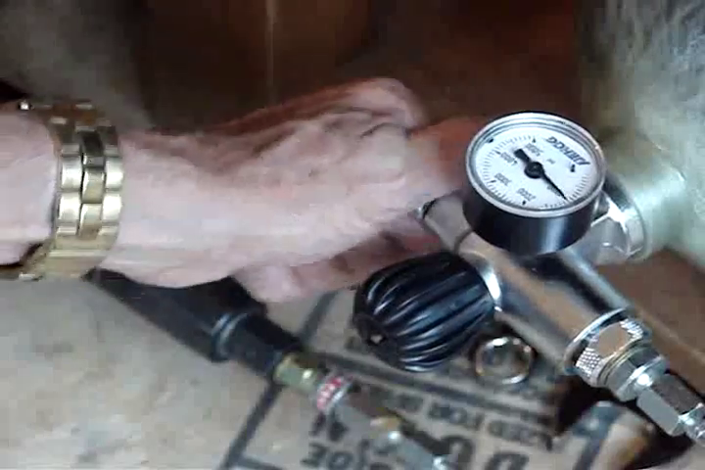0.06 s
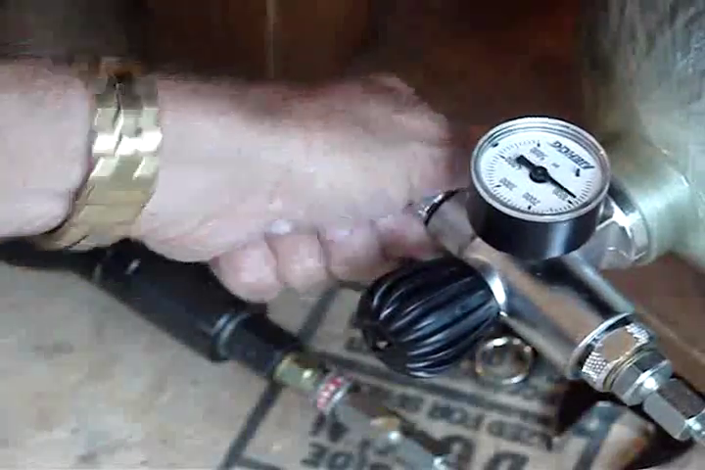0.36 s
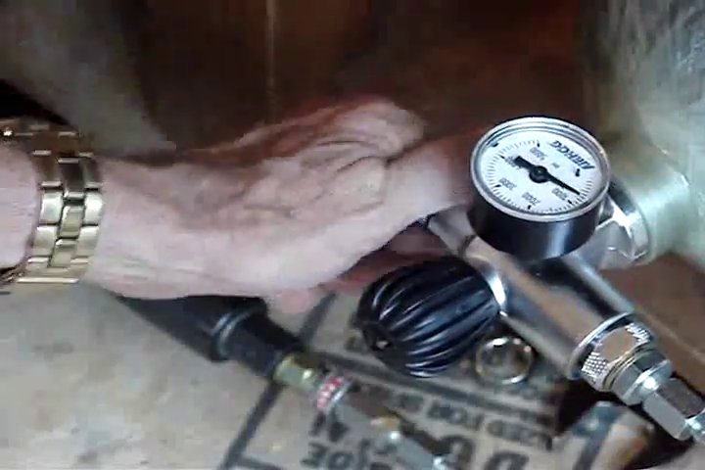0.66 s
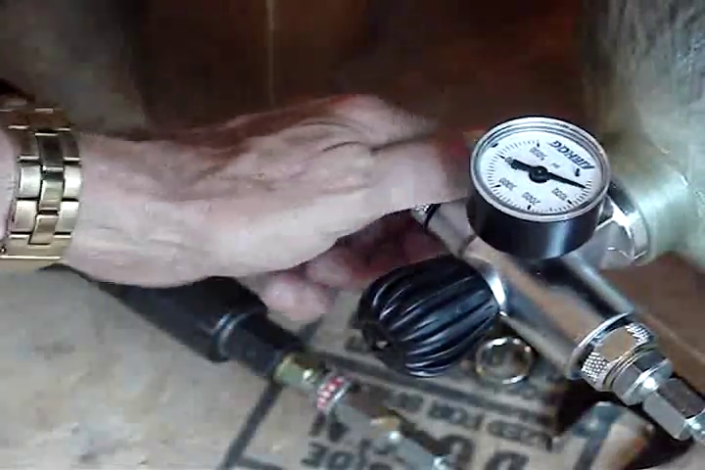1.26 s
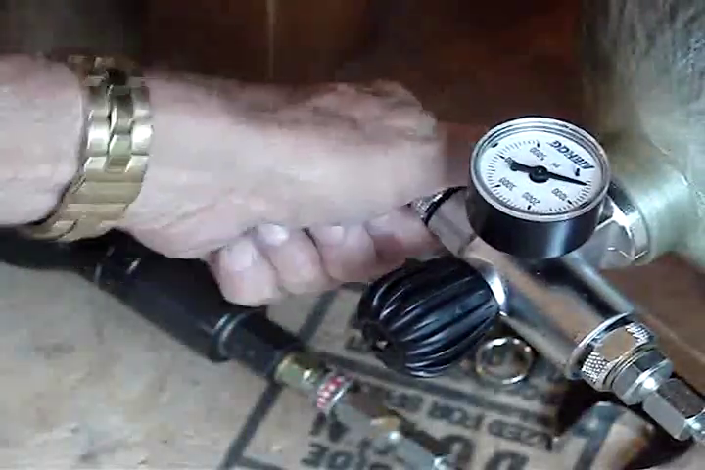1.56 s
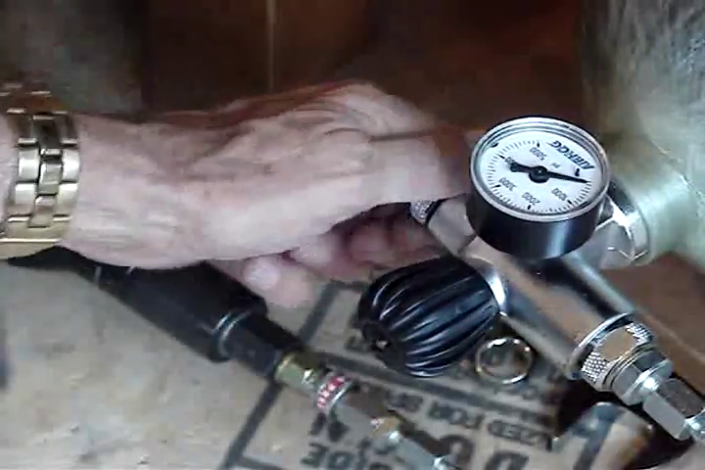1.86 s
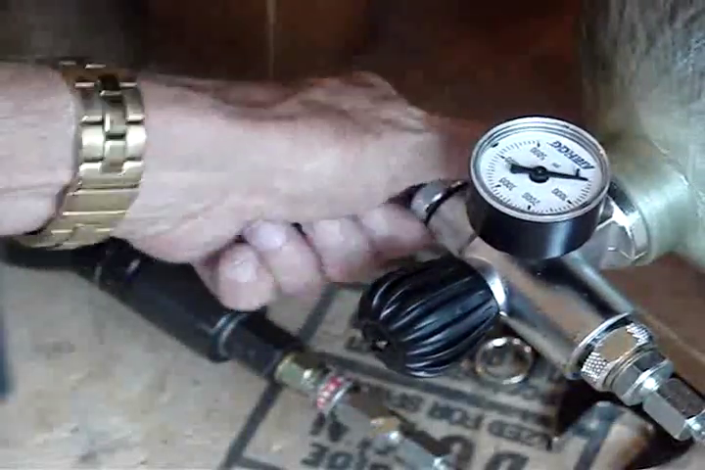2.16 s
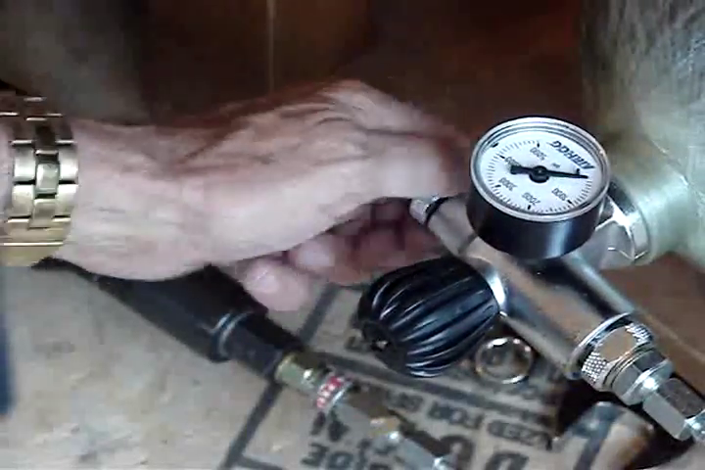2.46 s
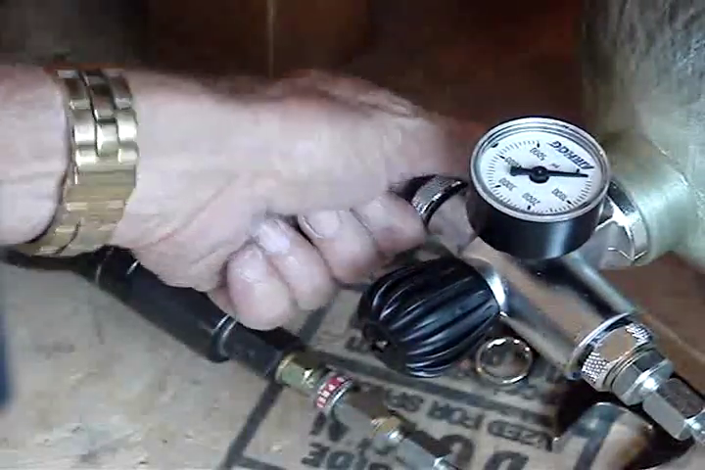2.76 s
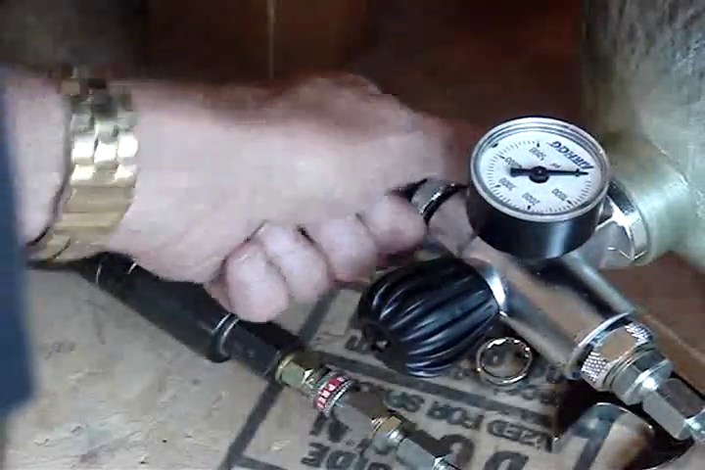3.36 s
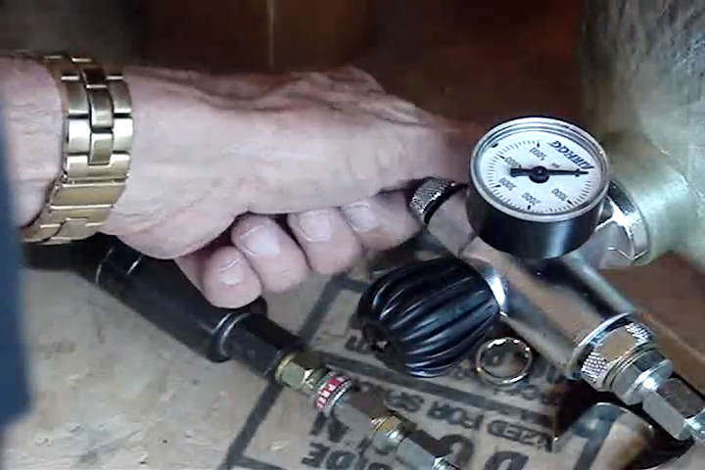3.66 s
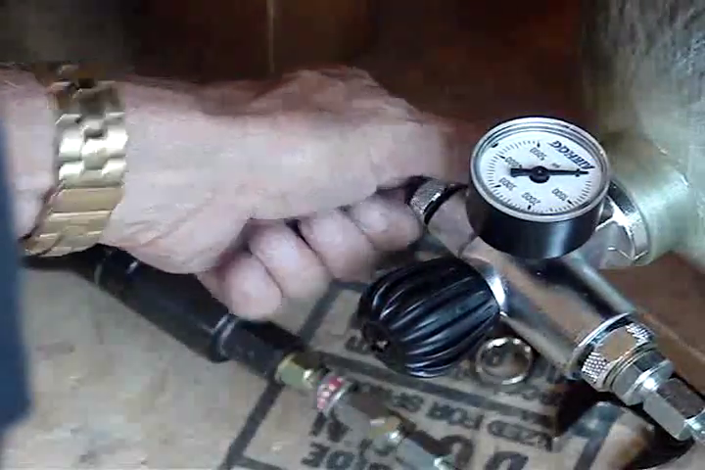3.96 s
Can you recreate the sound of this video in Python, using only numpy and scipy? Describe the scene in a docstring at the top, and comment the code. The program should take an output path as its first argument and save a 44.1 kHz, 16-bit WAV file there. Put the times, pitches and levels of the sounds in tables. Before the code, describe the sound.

Compressed air hisses through a valve in surges, then dies away over a low workshop hum.

```python
"""A close, bright hiss comes first: compressed air through a valve whose knob a hand turns in short twists.
The hiss rings in the hose fittings, flares into a bright gliding band on the first twists and dies
away as the pressure evens out. Beneath it the low rush and hum of a workshop slowly come forward.
One microphone hears it all, with faint reflections from bench and walls."""
import sys
import numpy as np
from scipy import signal
from scipy.fft import rfft, irfft
from scipy.io import wavfile

SR = 44100
rng = np.random.default_rng(int(sys.argv[2]) if len(sys.argv) > 2 else 0)


def dump(signal):
    """Clip the signal to [-1, 1] and save it as 16-bit WAV at the path in sys.argv[1]."""
    limited = np.clip(np.atleast_2d(signal).T, -1, 1)
    pcm = np.round(limited * 32767).astype(np.int16)
    wavfile.write(sys.argv[1], SR, pcm)


N = 176400
CUTOFF_HZ = 10090

# strength of the flow, heard as the hiss close to the valve: (time [s], level [dB])
FLOW_LEVEL = [(0, -34), (0.2, -35.5), (0.35, -37), (0.55, -36), (0.74, -34), (0.92, -35.5), (1.1, -37.0),
              (1.29, -38.5), (1.34, -34), (1.47, -36.5), (1.62, -35.5), (1.8, -36), (1.99, -35.5),
              (2.2, -39), (2.46, -40.5), (2.52, -42), (2.58, -41), (2.72, -44), (3.2, -51), (3.42, -50.5),
              (3.92, -58), (4, -54)]
# colour of that hiss: (frequency [Hz], level [dB])
HISS_COLOUR = [(100, -32), (300, -22.5), (600, -15.5), (800, -15.5), (980, -12), (1200, -15), (1500, -12),
               (1800, -10), (2300, -5.5), (2750, -5.5), (3080, -2.5), (3350, -3), (3600, -1), (3850, 1.5),
               (4300, -2), (4750, -3.5), (5150, -7), (5550, -5.5), (6000, -7), (6500, -5), (7200, -8),
               (8000, -9.5), (10000, -11)]
# the thin top of the jet at the microphone: (time [s], level [dB])
TREBLE_LEVEL = [(0, -41), (0.1, -34.5), (0.32, -39), (0.52, -39), (0.68, -37.5), (0.76, -42.5),
                (0.88, -38.5), (1.02, -37.5), (1.16, -40), (1.28, -36.5), (1.35, -32.0), (1.46, -38),
                (1.54, -34), (1.66, -41), (1.85, -37), (2.0, -40), (2.06, -43), (2.22, -45), (2.3, -39.5),
                (2.4, -41.5), (2.46, -36), (2.51, -43), (2.59, -40.5), (2.72, -48.5), (3.05, -51),
                (3.2, -48.5), (3.6, -54.5), (4, -58)]
# colour of that top: (frequency [Hz], level [dB])
TREBLE_COLOUR = [(5000, -33.5), (7200, -9), (7580, -2), (7850, 1), (8180, -1), (8480, 4.5), (8750, -1),
                 (9050, -5), (9350, 2), (9680, -15.5), (9920, 5), (10300, -46)]


def valve():
    """Air jets through the valve with a broad hiss and a thin whistling top."""
    audible = bins() < CUTOFF_HZ
    hiss = from_db(in_time(FLOW_LEVEL) + 2.5) * turbulence(colour(HISS_COLOUR) * audible)
    treble = turbulence(colour(TREBLE_COLOUR) * audible)
    whistle = from_db(-8) * noise(resonance(hz=8650, width_hz=120))
    return hiss + from_db(in_time(TREBLE_LEVEL)) * (treble + whistle)


def turbulence(gain, count=12):
    """Coloured noise whose bands each flicker by about 1 dB on their own."""
    spectrum = rfft(noise(gain))
    place = np.minimum(bins() / CUTOFF_HZ, 1) * (count - 1)
    bands = (irfft(spectrum * np.maximum(1 - abs(place - k), 0), N) for k in range(count))
    return rms_one(sum(band * from_db(drift(rate_hz=17)) for band in bands))


# the jet flaring close by as the knob turns:
# (start [s], end [s], level [dB], first centre [Hz], last centre [Hz], width [Hz])
TWIST_FLARES = [(-.05, .35, -33.5, 7280, 7180, 1510), (0.681, 0.782, -37, 4070, 3940, 800),
                (.7, 1.013, -32, 6300, 6900, 1500), (1.32, 1.414, -39, 3840, 3860, 700),
                (1.317, 1.568, -38, 7400, 7340, 1500), (1.93, 2.02, -38, 6450, 6610, 2200)]


def flares():
    """A twist brings out a band of hiss that swells, glides and fades."""
    out = 0
    for start, end, db, first_hz, last_hz, width_hz in TWIST_FLARES:
        band = noise(1 / np.sqrt(1 + (2 * (bins() - first_hz) / width_hz) ** 4))
        shift_hz = np.interp(seconds(), [start, end], [0, last_hz - first_hz])
        gliding = signal.hilbert(band) * np.exp(2j * np.pi * np.cumsum(shift_hz) / SR)
        out = out + from_db(db) * swell(start, end) * gliding.real
    return out


# air cavities in the hose fittings beside the valve: (frequency [Hz], width [Hz], level [dB])
FITTING_CAVITIES = [(1898, 45, -5.5), (2204, 61, 2), (2502, 84, 1)]
# moments when they ring out: (start [s], end [s], level [dB])
RING_OUTS = [(.37, .62, -42.5), (0.724, 0.927, -43), (1.0, 1.17, -41.5), (1.5, 1.998, -45.5),
             (2.25, 2.45, -50.5)]


def fittings():
    """Hollow resonances, faint under the flow and stronger as the grip changes."""
    ringing = sum(from_db(db) * noise(resonance(hz, width) * resonance(hz, hz / 2))
                  for hz, width, db in FITTING_CAVITIES)
    flow_power = from_db(in_time(FLOW_LEVEL) - 14) ** 2
    grip_power = sum((from_db(db) * swell(start, end)) ** 2 for start, end, db in RING_OUTS)
    return np.sqrt(flow_power + grip_power) * rms_one(ringing)


# reflections reaching the microphone from bench and walls: (delay [s], level [dB])
REFLECTIONS = [(.0033, -23.5), (.0074, -23.5), (0.0124, -25.5), (.0213, -15), (0.033, -18)]


def bench(air):
    """Near surfaces add faint copies that comb the hiss."""
    return air + sum(from_db(db) * np.roll(air, int(delay * SR)) for delay, db in REFLECTIONS)


# soft low bumps of handling at the microphone: (time [s], level [dB], half-length [s])
HANDLING_BUMPS = [(.02, -46, 0.058), (1.34, -54, .03), (1.955, -47, 0.033)]


def handling():
    """Handling makes short swells of deep rumble."""
    envelope = sum(from_db(db) * np.exp(-((seconds() - time) / half_length) ** 2)
                   for time, db, half_length in HANDLING_BUMPS)
    return envelope * noise(resonance(hz=34.5, width_hz=34.5) ** 2)


# low rush of the workshop, farther off behind the valve: (time [s], level [dB])
ROOM_LEVEL = [(0, -53.5), (.3, -56.5), (.7, -53.5), (1.25, -48), (2.3, -48), (2.85, -45), (3.5, -44.5),
              (4, -44)]
# colour of that rush: (frequency [Hz], level [dB])
ROOM_COLOUR = [(15, -26.5), (25, -3), (48, -9), (68, -3.5), (95, -6.5), (140, -3), (190, -7.5), (270, -6.5),
               (380, -3.5), (520, -1.5), (750, -3.5), (930, -0.5), (1150, -5.5), (1480, -6.5),
               (1750, -10.5), (2200, -13.5), (3000, -20.5), (5000, -28.5), (10000, -33)]
# a motor in the background, when the rush is loudest: (frequency [Hz], level [dB])
MOTOR_HUM = [(118.6, -58.5), (226, -62.5), (350.5, -56), (452, -63), (531, -58.5)]


def workshop(hum_width_hz=8.7):
    """A dull rush with a wavering motor hum that rises along with it."""
    level_db = in_time(ROOM_LEVEL)
    hum = sum(from_db(db) * noise(1 / (1 + (2 * (bins() - hz) / hum_width_hz) ** 2))
              for hz, db in MOTOR_HUM)
    rush = from_db(level_db + 3) * noise(colour(ROOM_COLOUR))
    return rush + from_db(level_db - level_db.max()) * hum


def swell(start, end, ramp_s=0.11):
    """Rise, hold and fade of one twist of the hand."""
    rise = np.clip((seconds() - start) / ramp_s + .5, 0, 1)
    fade = np.clip((end - seconds()) / ramp_s + .5, 0, 1)
    return rise * fade


def from_db(db):
    """Decibels to gain."""
    return 10 ** (np.asarray(db) / 20)


def rms_one(x):
    """Scale to unit power."""
    return x / np.sqrt(np.mean(x ** 2) + 1e-20)


def seconds():
    """Time of each sample."""
    return np.arange(N) / SR


def bins():
    """Frequency of each spectral bin."""
    return np.maximum(np.arange(N // 2 + 1) * SR / N, 1)


def in_time(rows):
    """A curve joined by straight lines."""
    return np.interp(seconds(), *np.transpose(rows))


def colour(points):
    """Gain of each bin from a spectrum table."""
    hz, db = np.transpose(points)
    return from_db(np.interp(np.log(bins()), np.log(hz), db))


def resonance(hz, width_hz):
    """Gain of each bin through one resonance."""
    f = bins()
    return 1 / np.sqrt(1 + ((f * f - hz * hz) / (f * width_hz)) ** 2)


def noise(gain):
    """Noise of the given colour, unit power."""
    return rms_one(irfft(rfft(rng.standard_normal(N)) * gain, N))


def drift(rate_hz):
    """A slow random wander with a spread of one."""
    return noise(1 / (1 + (bins() / rate_hz) ** 2))


def scene():
    """Air, workshop and handling at one microphone, the same in both channels."""
    air = valve() + fittings() + flares()
    flutter = from_db(0.4 * drift(rate_hz=35))
    return np.tile(bench(air * flutter) + workshop() + handling(), (2, 1))


def record(dry):
    """The treble is cut steeply above the cutoff."""
    return irfft(rfft(dry) / np.sqrt(1 + (bins() / CUTOFF_HZ) ** 600), N)


dry = scene()
out = record(dry)
dump(out)
```